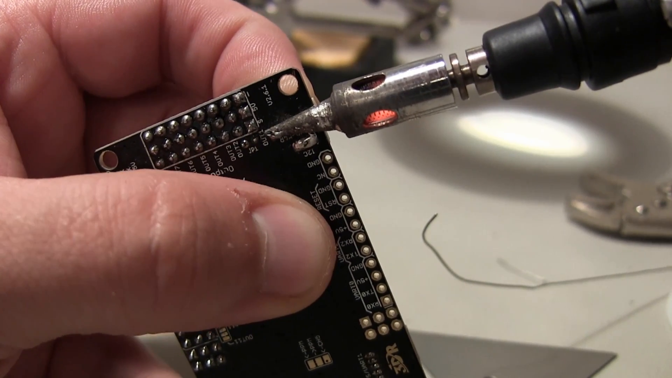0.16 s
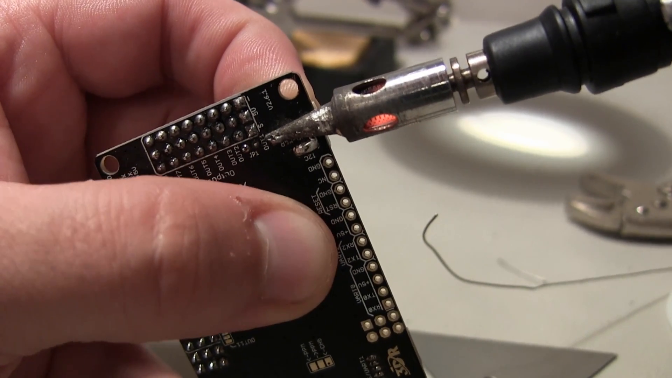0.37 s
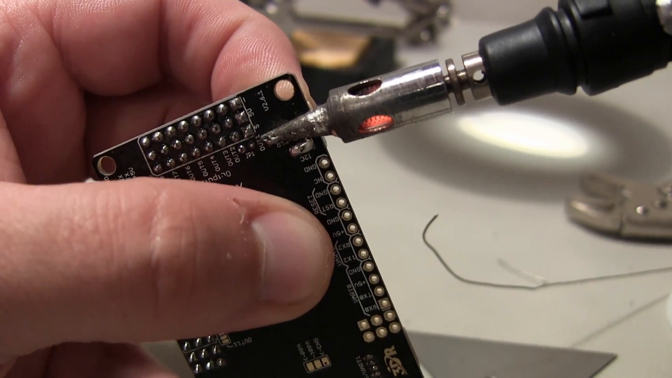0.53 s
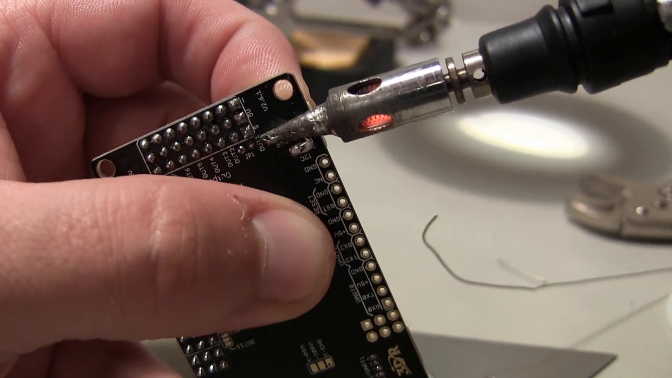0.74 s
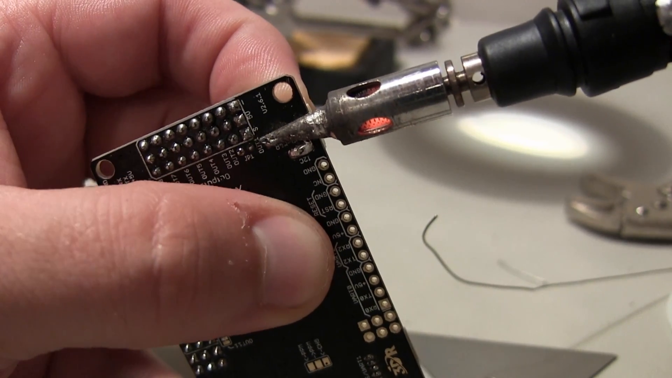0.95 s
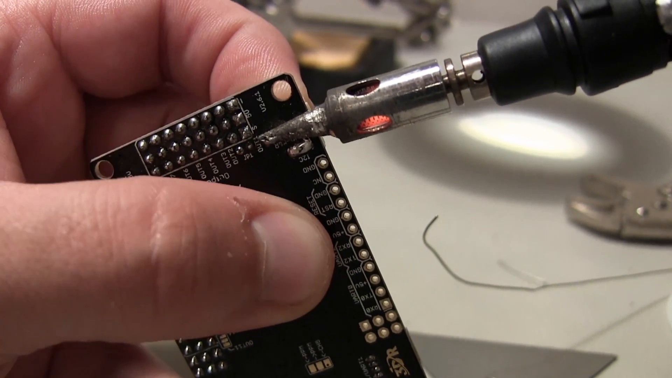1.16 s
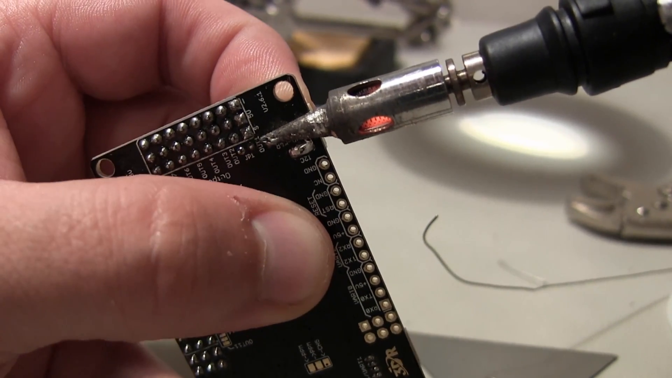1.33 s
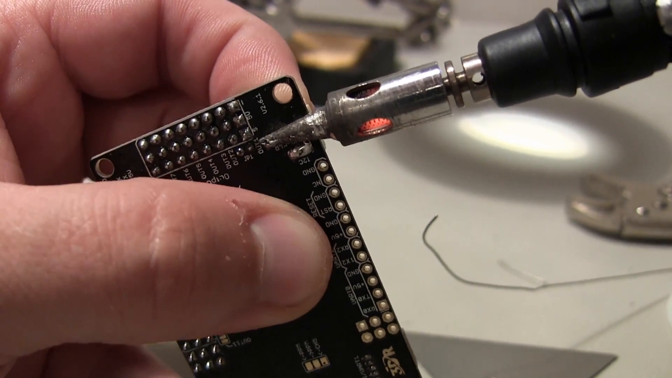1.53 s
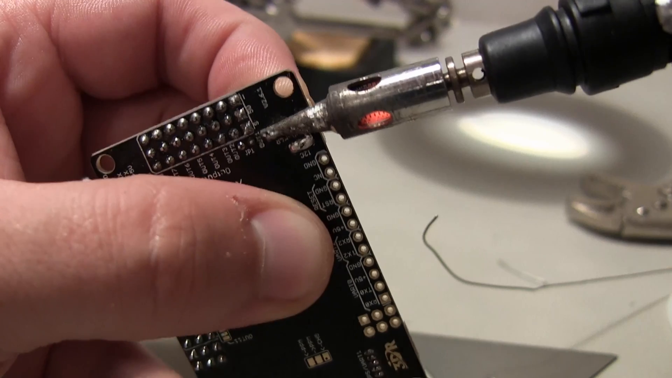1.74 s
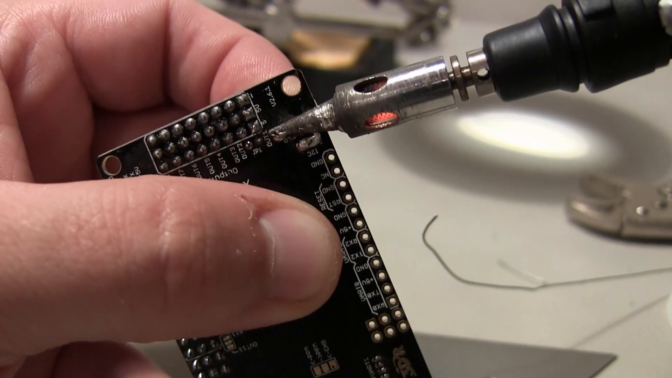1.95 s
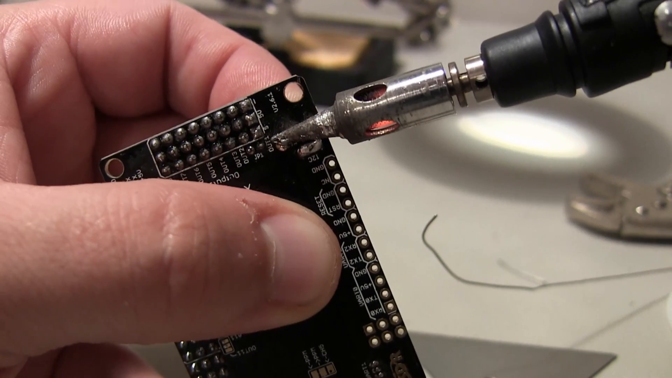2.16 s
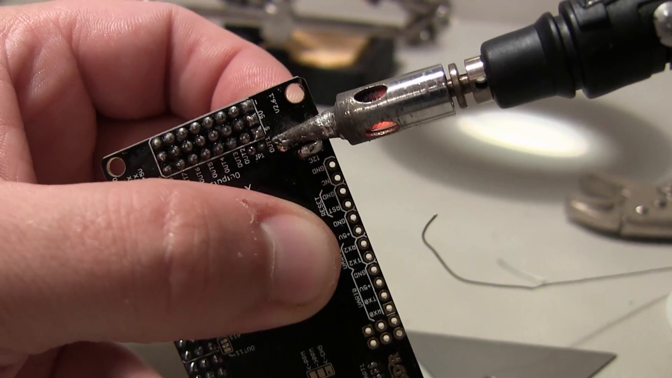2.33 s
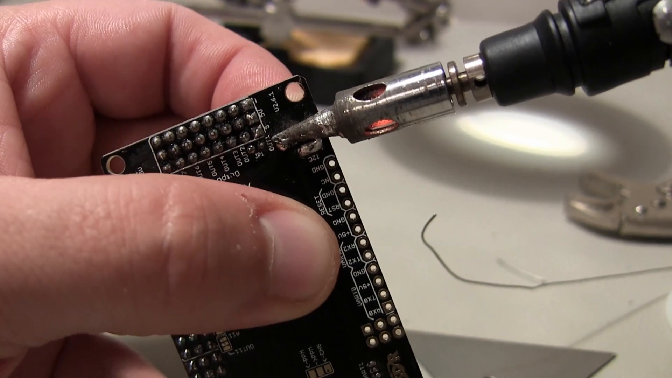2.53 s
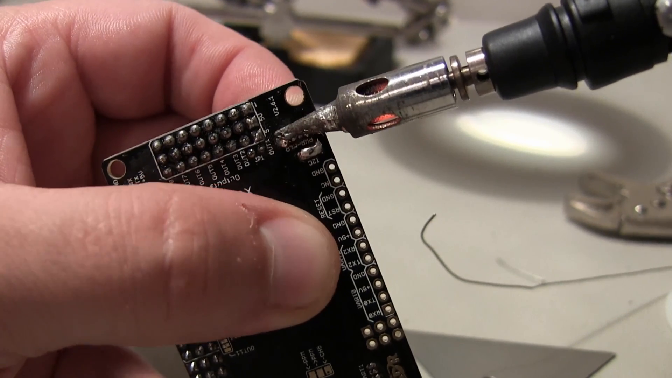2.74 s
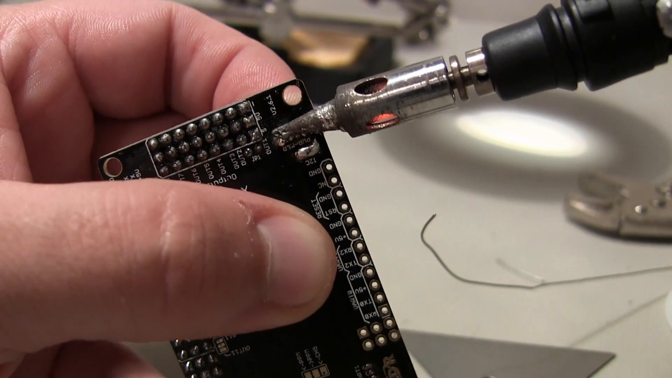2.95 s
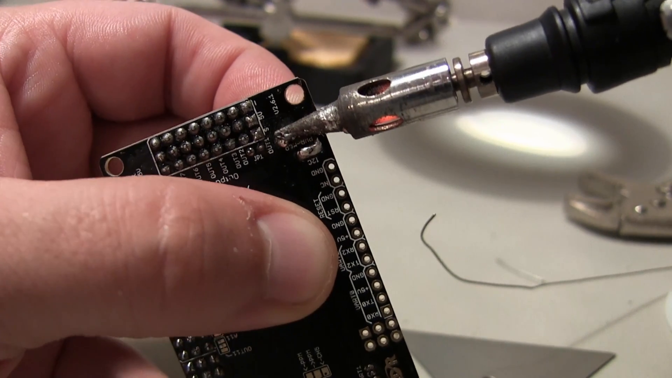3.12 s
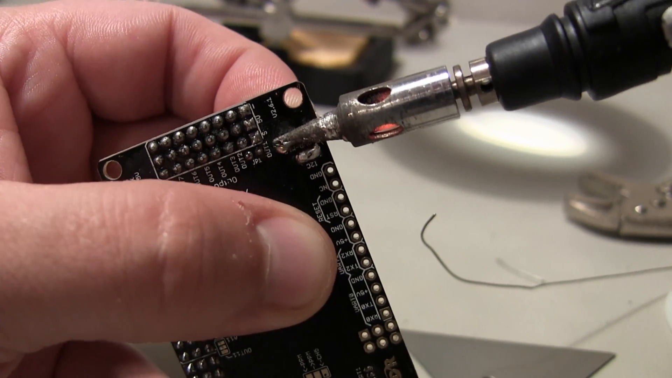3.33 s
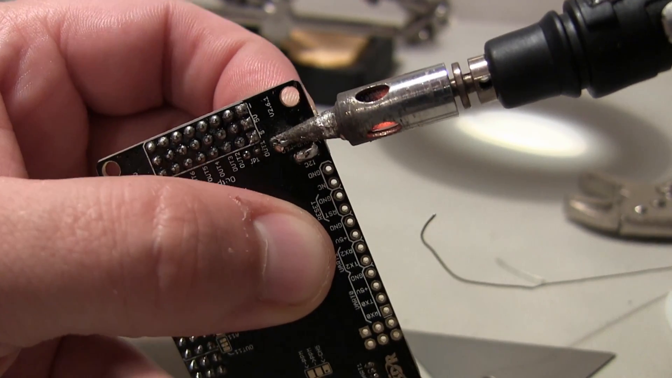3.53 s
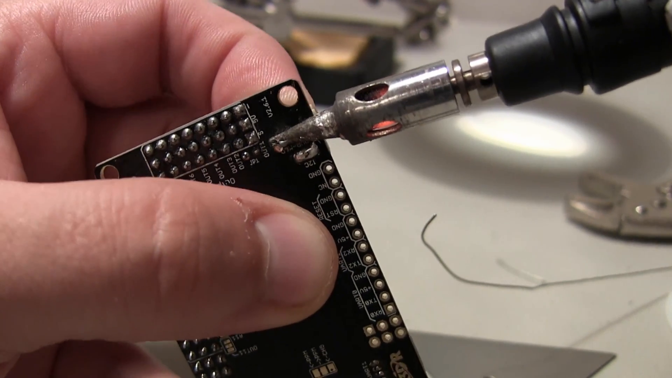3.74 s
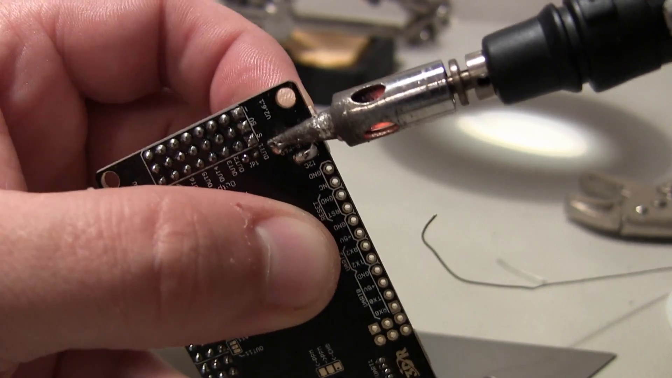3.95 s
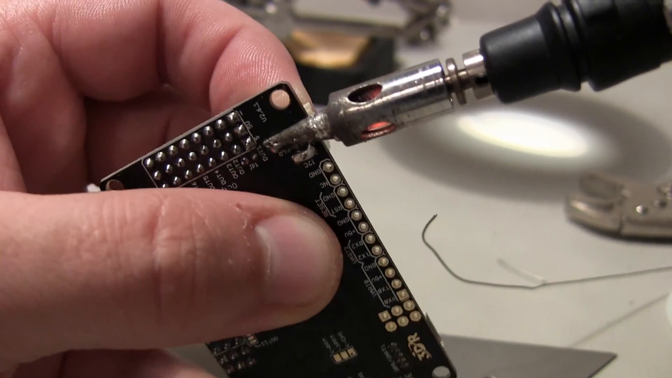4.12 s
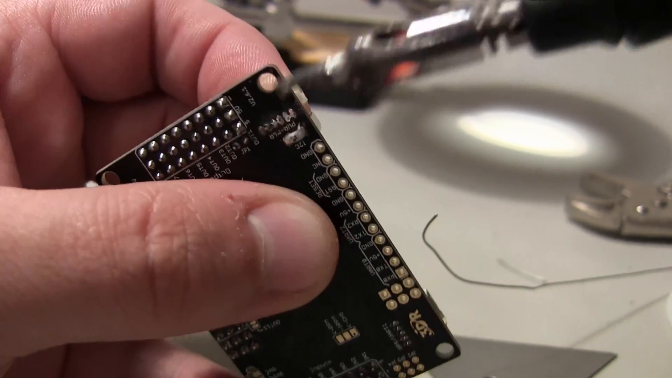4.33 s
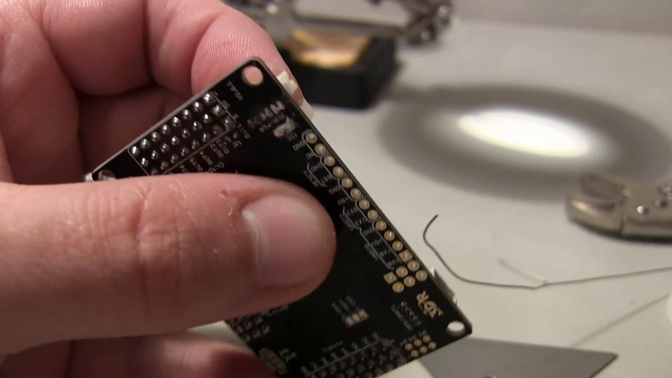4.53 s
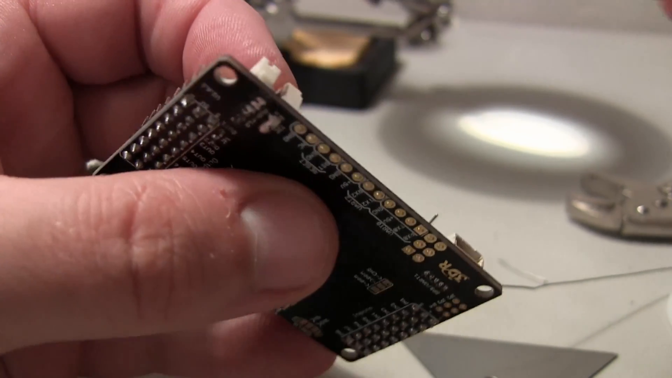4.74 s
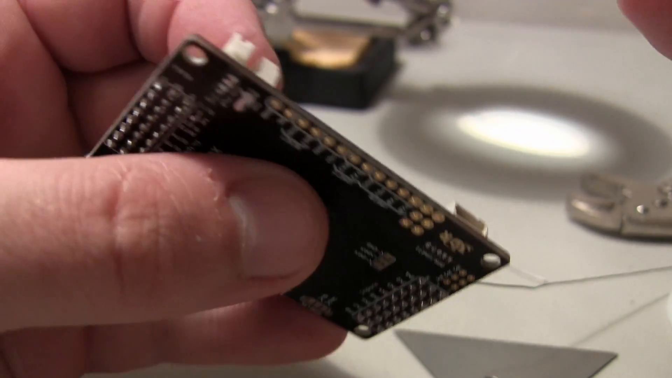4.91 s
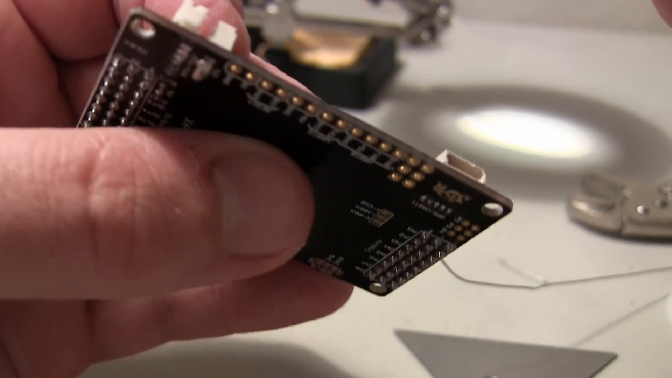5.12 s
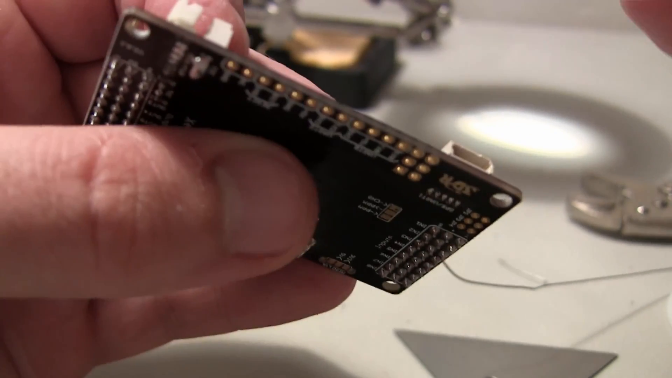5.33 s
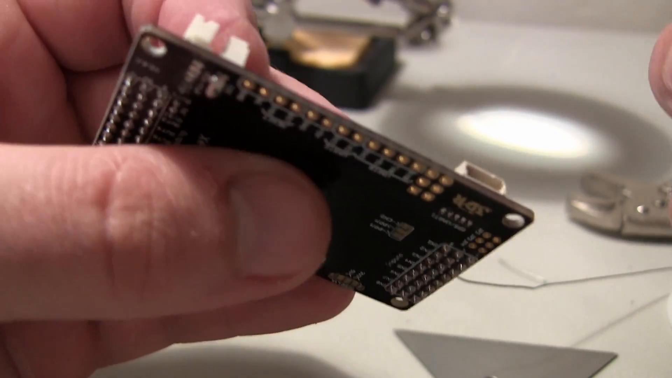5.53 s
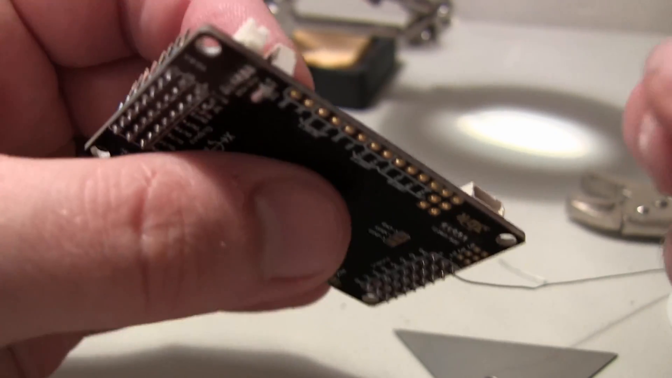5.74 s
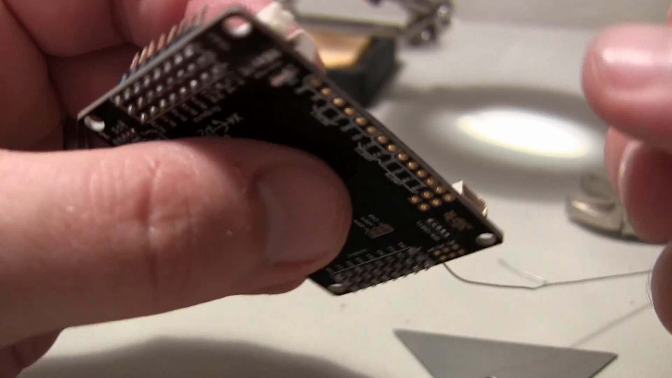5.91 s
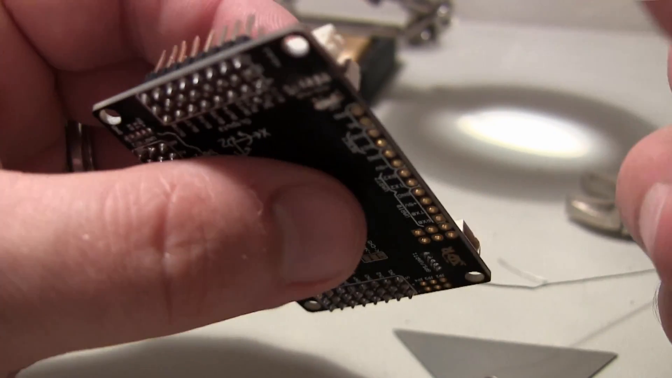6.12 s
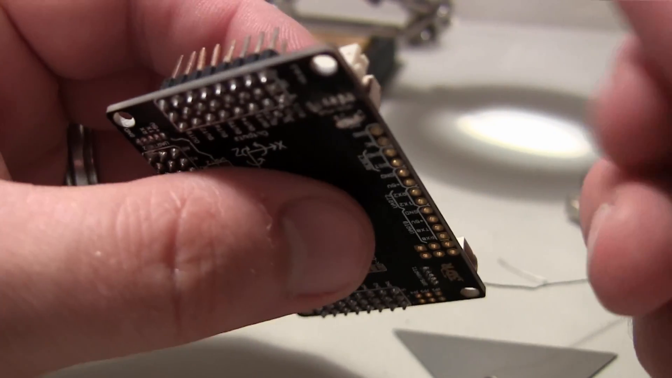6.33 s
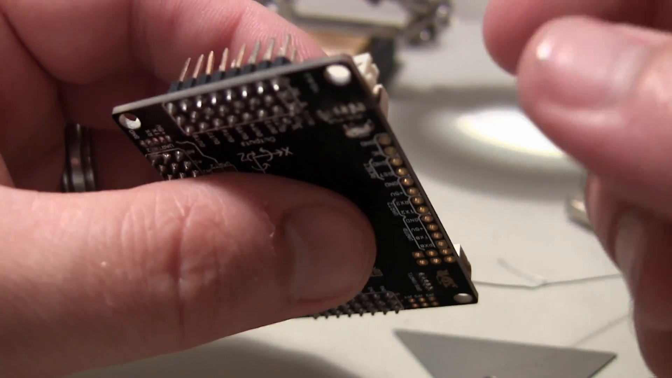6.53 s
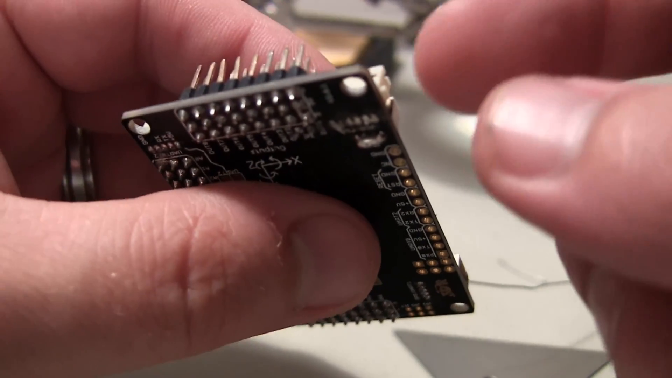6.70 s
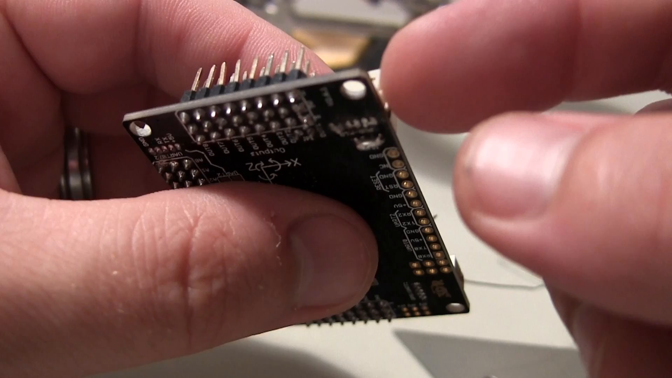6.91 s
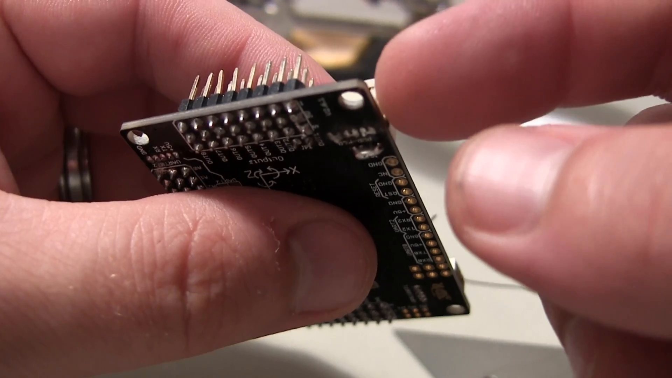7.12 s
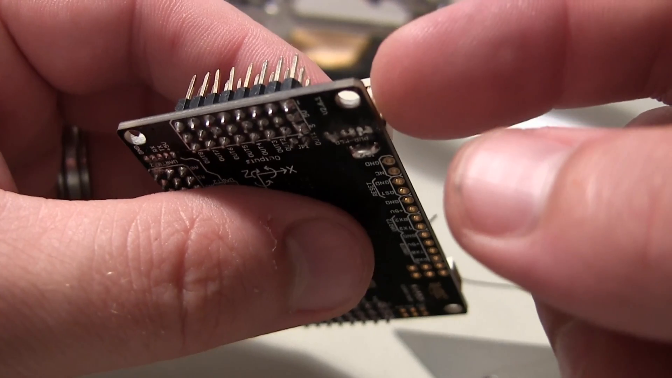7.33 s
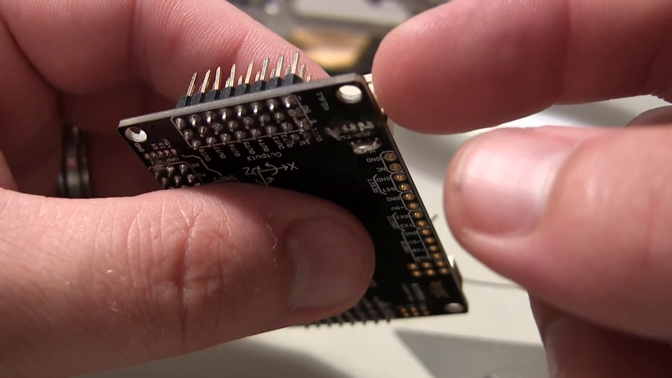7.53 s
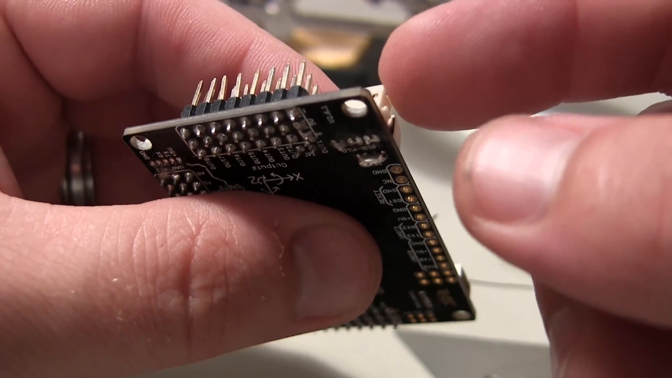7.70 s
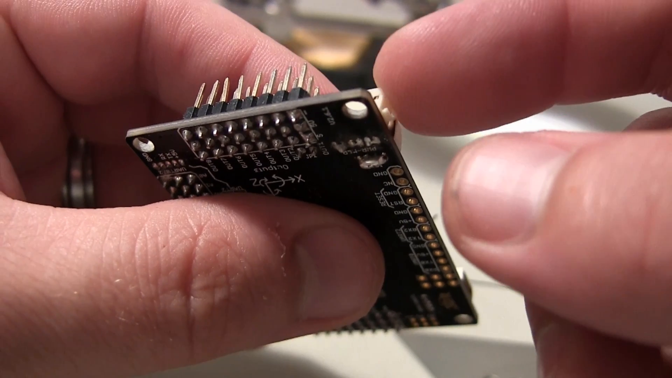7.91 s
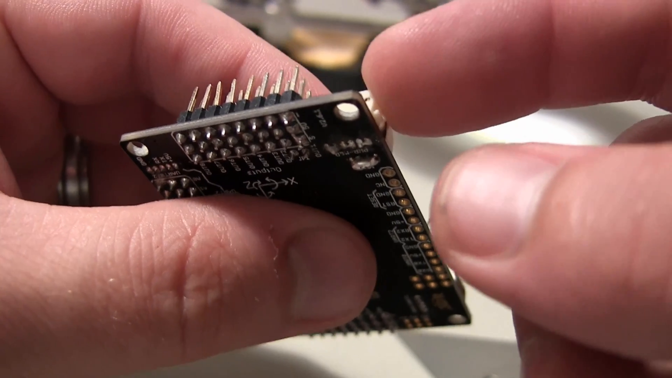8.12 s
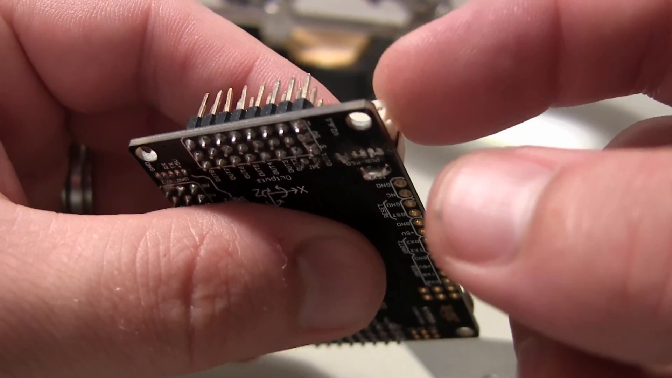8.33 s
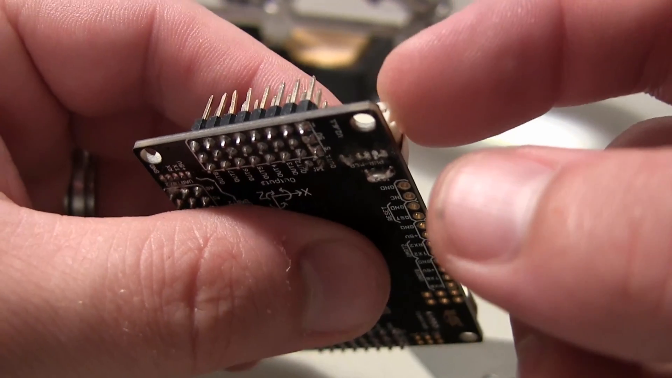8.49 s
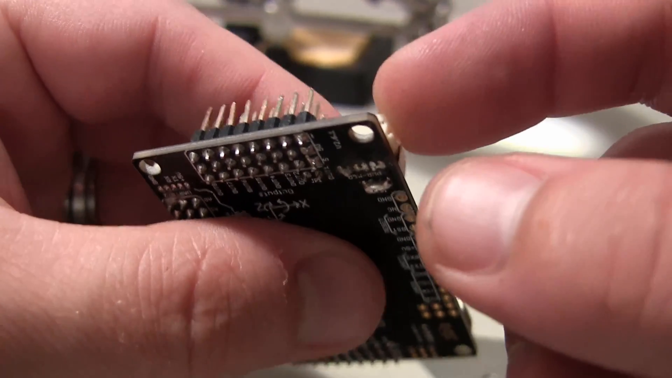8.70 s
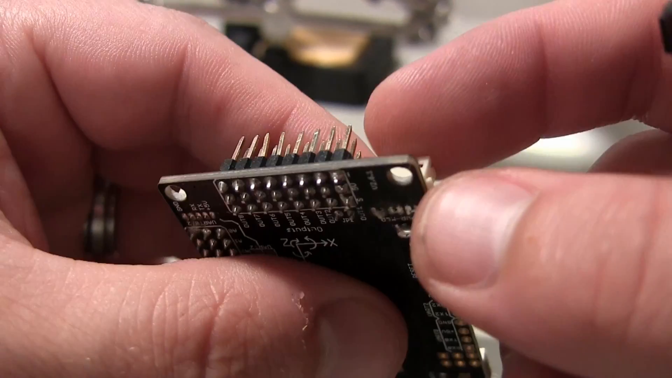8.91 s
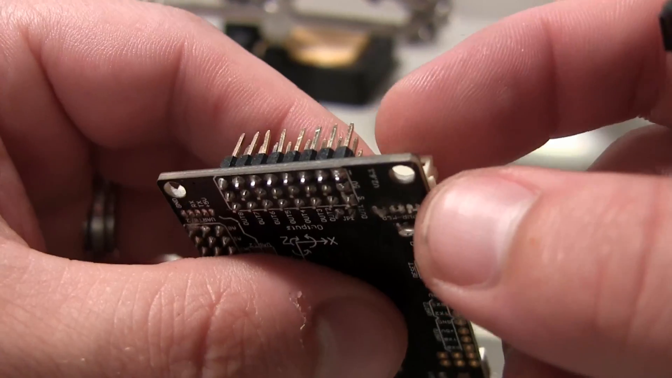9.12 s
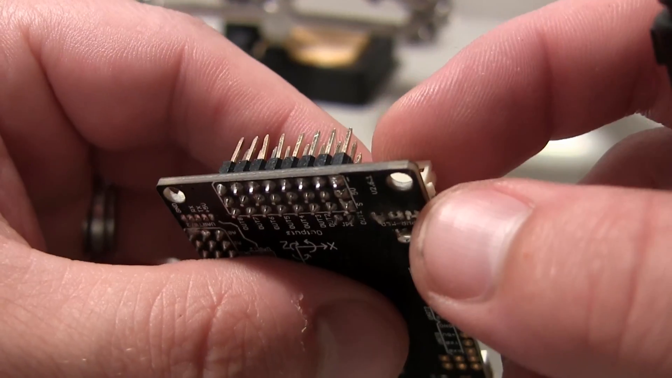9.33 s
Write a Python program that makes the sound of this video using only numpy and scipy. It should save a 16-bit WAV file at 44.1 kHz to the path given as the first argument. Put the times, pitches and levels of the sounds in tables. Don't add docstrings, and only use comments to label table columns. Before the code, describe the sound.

Close, continuous high hiss of a burning gas jet in a quiet indoor workshop, nearly constant at first, then fading to a quieter, hollow, shifting hiss as the tool is carried off. Small dry ticks and one sharper click land on the bench. The hiss settles steady again; underneath is weak low rumble, and finally a low compressor hum with soft shudders joins in.

```python
import sys
import numpy as np
from scipy import signal
from scipy.fft import rfft, irfft, next_fast_len
from scipy.io import wavfile
from scipy.ndimage import uniform_filter1d, map_coordinates

SR = 44100
rng = np.random.default_rng(int(sys.argv[2]) if len(sys.argv) > 2 else 0)


def int16_out(signal):
    q = np.round(np.clip(np.atleast_2d(signal).T, -1, 1) * 32767)
    wavfile.write(sys.argv[1], SR, q.astype(np.int16))


def voltage_ratio(decibels):
    exponent = np.asarray(decibels, float) / 20
    return 10 ** exponent


N = 417186


def unit(x):
    return x / np.sqrt(np.mean(x ** 2) + 1e-20)


def along(points, hz):
    f, v = np.transpose(points)
    return np.interp(np.log(hz + 1), np.log(f + 1), v)


def wobble(rate):
    knots = rng.standard_normal(int(N * rate / SR) + 4)
    return map_coordinates(knots, [np.arange(N) * rate / SR])


def ring(hz, t60, attack):
    t = np.arange(SR // 4) / SR
    return np.sin(2 * np.pi * hz * t) * voltage_ratio(-60 * t / t60) * (1 - np.exp(-t / attack))


def add(track, s, sound):
    part = track[round(s * SR):][:len(sound)]
    part += sound[:len(part)]


def comb(echoes, hz, stretch):
    mirror_hz = 3000
    total = 0
    for ms, left, right in echoes:
        phase = np.exp(-2j * np.pi * hz * stretch * ms / 1000)
        total = total + phase * np.reshape([left, right], (2, 1, 1))
    return 1 + hz / np.hypot(hz, mirror_hz) * total


def clutter(count):
    delays_ms = np.geomspace(1.9, 4.5, count)
    gains = 0.06 * rng.standard_normal((count, 2))
    return [(ms, *g) for ms, g in zip(delays_ms, gains)]


def hands(t, count):
    roam, turns_per_s = 0.035, 2.2
    knots = rng.standard_normal((count, int(t[-1] * turns_per_s) + 4))
    gains = 0.12 * (1 + rng.standard_normal((count, 2)) / 4)
    delays_ms = np.geomspace(0.7, 3.6, count)
    return [(ms * (1 + roam * map_coordinates(k, [t * turns_per_s])), *g)
            for ms, k, g in zip(delays_ms, knots, gains)]


def pose_echoes(t):
    # (delay [ms], left gain [ratio], right gain [ratio])
    tilted = [(0.202, 0.16, 0.195), (0.27, 0.3, 0.279), (0.41, -0.056, -0.1), (0.48, 0.087, 0.088),
              (0.577, -0.12, -0.156), (0.74, 0.124, 0.133), (0.804, 0.102, 0.103), (0.854, 0.141, 0.149),
              (0.964, 0.073, 0.091), (1.091, -0.084, -0.066), (1.557, -0.111, -0.087)]
    held = [(0.201, 0.209, 0.252), (0.285, 0.349, 0.365), (0.469, 0.123, 0.155), (0.513, 0.119, 0.167),
            (0.699, 0.076, 0.101), (0.758, 0.185, 0.208), (0.815, 0.135, 0.147), (0.867, 0.165, 0.169),
            (0.967, 0.107, 0.101), (1.103, -0.07, -0.051), (1.199, -0.101, -0.109)]
    lifted = [(0.158, 0.175, 0.2), (0.206, 0.174, 0.171), (0.343, 0.22, 0.18), (0.372, 0.349, 0.395),
              (0.532, 0.165, 0.153), (1.135, 0.078, 0.07)]
    carried = [(0.295, -0.193, -0.175), (0.379, 0.114, 0.126), (0.711, -0.14, -0.113),
               (0.768, -0.18, -0.171), (0.813, -0.092, -0.091), (0.996, 0.081, 0.082),
               (1.109, 0.089, 0.072)]
    lowered = [(.059, .22, .22), (.183, .155, .147), (.34, .17, .198), (.391, .143, .159),
               (.54, .143, .106), (.91, -.101, -.091), (1.598, .069, .091), (2.041, -.074, -.109)]
    propped = [(.143, -.148, -.217), (.21, -.044, -.098), (.284, -.151, -.116), (.338, -.084, -.153),
               (.537, .107, .116), (.86, .07, .064), (2.507, -.053, -.075)]
    laid = [(0.218, -0.027, -0.138), (0.29, -0.325, -0.255), (0.368, -0.127, -0.115), (0.434, 0.144, 0.187),
            (0.574, 0.127, 0.137), (0.675, 0.239, 0.153), (0.898, 0.046, 0.114), (1.0, -0.126, -0.005),
            (1.517, -0.068, -0.065), (1.678, -0.111, -0.076), (2.163, -0.065, -0.067)]
    nudged = [(0.157, -0.177, -0.211), (0.176, 0.26, 0.322), (0.277, -0.284, -0.235), (0.429, 0.173, 0.232),
              (0.537, 0.096, 0.112), (0.631, 0.156, 0.132), (0.681, 0.128, 0.137), (0.972, -0.084, -0.083),
              (1.477, 0.112, 0.089)]
    busy = hands(t, count=8)
    palm_ms = np.interp(t, (6.05, 6.75), (0.345, 0.425))
    palm = [(palm_ms, 0.14, 0.14)]
    return [tilted, held, lifted + busy[:4], carried + busy, lowered + busy, propped + busy + palm,
            laid + clutter(count=5), nudged + clutter(count=5)]


def iron():
    # (frequency [Hz], density [dB per Hz])
    toward = [(1050, -27.5), (1400, -27), (2100, -20), (3600, -21.5), (6500, -16), (10500, -5.5),
              (14000, 0.5), (15500, -12)]
    # (frequency [Hz], density [dB per Hz])
    aimed_off = [(1050, -29.5), (1400, -15.5), (2100, -12.5), (3600, -12.5), (6500, -9.5), (10500, -4.5),
                 (13300, 0.5), (15600, -6.5)]
    # (time [s], level [dB])
    jet = [(0, -25.5), (1.85, -25.5), (2.1, -27), (3.05, -27), (4.1, -25.5), (4.3, -25.5), (4.7, -30),
           (4.83, -35.5), (5.33, -35), (5.7, -35.5), (6.55, -34), (7.06, -32), (7.77, -32), (8.9, -32),
           (9.46, -31.5)]
    # (leaves [s], arrives [s], pose [index])
    moves_on = [
        (1.93, 2.1, 0),
        (3.35, 3.8, 1),
        (4.42, 4.56, 2),
        (4.74, 4.84, 3),
        (5.25, 5.42, 4),
        (5.82, 5.97, 5),
        (6.5, 6.78, 6),
        (8.77, 8.9, 7),
    ]
    reach = 1.28
    lean_away_db, top_hz = -0.9, 15460
    hz, t, z = signal.stft(rng.standard_normal((3, N)), SR, nperseg=512, noverlap=384)
    tall_hz = hz[:, None]

    leaves, arrives, to = np.transpose(moves_on)
    came_from = np.r_[1, to[:-1]]
    pose = np.interp(t, np.ravel([leaves, arrives], 'F'), np.ravel([came_from, to], 'F'))
    stretch = np.interp(t, (4.25, 4.57), (1, reach))
    paths = np.zeros((2,) + z.shape[1:], complex)
    for k, echoes in enumerate(pose_echoes(t)):
        share = np.clip(1 - np.abs(pose - k), 0, 1)
        now = share > 0
        slid = stretch[now] / (reach if k > 1 else 1)
        present = [(np.broadcast_to(ms, t.shape)[now], left, right) for ms, left, right in echoes]
        paths[..., now] += share[now] * np.log(comb(present, tall_hz, slid))

    away = np.interp(t, (4.3, 4.85), (0, 1))
    aim_db = np.outer(along(toward, hz), 1 - away) + np.outer(along(aimed_off, hz), away)
    lean = voltage_ratio(lean_away_db / 2 * away * np.reshape([1, -1], (2, 1, 1)))
    band = np.clip(tall_hz / 560, 0, 1) ** 4 / (1 + (tall_hz / top_hz) ** 70)
    paths = np.exp(paths) * voltage_ratio(aim_db) * lean * band
    paths /= np.sqrt(np.mean(np.abs(paths) ** 2, axis=(0, 1)))

    field = uniform_filter1d(rng.standard_normal(z.shape[1:]), 8, 0)
    unrest_db = 0.39 * unit(uniform_filter1d(field, 40, 1))
    scatter = voltage_ratio(along([(2000, -10.5), (6000, -8.0), (15000, -14.0)], hz))[:, None]
    heard = paths * voltage_ratio(unrest_db) * (z[0] + scatter * z[1:])
    hiss = unit(signal.istft(heard, SR, nperseg=512, noverlap=384)[1][:, :N])
    flutter_db = 0.094 * wobble(9) + 0.27 * wobble(35)
    jet_s, jet_db = np.transpose(jet)
    return hiss * voltage_ratio(np.interp(np.arange(N) / SR, jet_s, jet_db) + flutter_db)


def workshop():
    # (frequency [Hz], level [dB])
    mains = [(59.2, -58.5), (118.4, -60.5)]
    # (frequency [Hz], density [dB per Hz])
    air = [(15, -24), (46, -17), (96, -12.5), (370, -0.5), (650, -12.5), (1080, -18), (1690, -29),
           (2860, -120)]
    # (frequency [Hz], width [Hz], height [dB])
    booms = [(138, 14.6, 8.5), (224, 8.3, 8), (244.4, 2.7, -2), (314, 24, -3.5), (378.6, 7.1, 6.5),
             (484, 16, 5), (805, 104, 11)]
    # (frequency [Hz], correlation [ratio])
    alike = [(60, 0.13), (180, 0.46), (550, 0.82), (1650, 0.86), (4970, 0.93), (15000, 0.97)]
    # (frequency [Hz], left over right [dB])
    balance = [(60, -7.5), (240, -2), (950, -2.5), (3770, 2), (15000, 0.0)]
    air_db, swell_db = -51, 0.5
    m = next_fast_len(N)
    hz = np.fft.rfftfreq(m, 1 / SR)
    resonance = sum(voltage_ratio(db) ** 2 / (1 + (2 * (hz - c) / w) ** 2) for c, w, db in booms)
    colour = voltage_ratio(along(air, hz)) * np.sqrt(1 + resonance)
    turn = np.arccos(np.clip(along(alike, hz), -1, 1)) / 2
    mid, side = rfft(rng.standard_normal((2, m))) * [np.cos(turn), np.sin(turn)]
    lean = voltage_ratio(along(balance, hz) / 2)
    rumble = unit(irfft(colour * [(mid + side) * lean, (mid - side) / lean], m)[:, :N])

    t = np.arange(N) / SR
    hum = 0
    for (f, db), pan_db in zip(mains, (0.9, -1.2)):
        level_db = db + 0.5 + 0.37 * wobble(2.93) + np.array([[pan_db], [-pan_db]])
        hum = hum + voltage_ratio(level_db) * np.sin(2 * np.pi * f * t + 0.2 * wobble(2.1))
    return voltage_ratio(air_db + swell_db * wobble(4)) * rumble + hum


def ticks():
    # (time [s], peak [dB], click [Hz], knock share [dB])
    contacts = [
        (5.825, -27, 1220, -5.5),
        (5.891, -23.5, 4220, -30),
        (5.903, -29.5, 1610, -14),
        (6.207, -33, 4300, -22),
        (6.238, -29, 3600, -23),
        (6.29, -36, 4800, -26),
        (6.334, -18.5, 4300, -32),
        (6.567, -32, 4520, -21),
    ]
    # (frequency [Hz], level [dB], t60 [s])
    bench = [(290, -1, .07), (480, 5, 0.035), (810, 1, .04), (1190, 5, 0.04)]
    crack_db = -4
    x = np.zeros(N)
    snap = ring(2000, 0.007, 0.00005) + ring(2900, 0.006, 0.00005) + ring(4100, 0.006, 0.00005)
    spreads = rng.standard_normal((len(contacts), len(bench)))
    for (s, db, hz, knock_db), spread in zip(contacts, spreads):
        click = ring(hz, 0.011, 0.0004)
        click = click - 0.7 * ring(0.9 * hz, 0.008, 0.0004) - 0.6 * ring(1.1 * hz, 0.007, 0.0004)
        front = click + voltage_ratio(crack_db + 0.5 * (knock_db + 12.5)) * snap
        knock = sum(voltage_ratio(level + 1.9 * d) * ring(f, t60, 0.00057)
                    for (f, level, t60), d in zip(bench, spread))
        add(x, s, voltage_ratio(db) * front + voltage_ratio(db + knock_db - 3.0) * knock)
    add(x, 9.177, voltage_ratio(-36.5) * ring(1110, 0.055, 0.0028))
    return x * voltage_ratio([[-0.4], [0.4]])


def fridge():
    # (time [s], peak [dB])
    shudders = [
        (8.639, -39),
        (8.85, -41),
        (9.039, -41),
        (9.24, -36),
        (9.36, -43.5),
    ]
    start_s, windup_s, start_db, run_db = 8.63, 0.25, -70, -50
    t = np.arange(N) / SR
    hum_db = start_db + (run_db - start_db) * np.minimum((t - start_s) / windup_s, 1)
    x = voltage_ratio(hum_db + 2.5 + 0.5 * wobble(12)) * np.sin(2 * np.pi * 119.9 * t)
    for s, db in shudders:
        add(x, s, voltage_ratio(db) * ring(289, 0.24, 0.019))
    add(x, start_s, voltage_ratio(-50) * ring(60, 0.5, 0.02))
    return x * voltage_ratio([[-0.8], [0.8]])


def scene():
    return iron() + workshop() + ticks() + fridge()


def low_pass(x):
    return signal.sosfilt(signal.butter(12, 16010, fs=SR, output="sos"), x)


def record(dry):
    return low_pass(dry)


dry = scene()
out = record(dry)
int16_out(out)
```